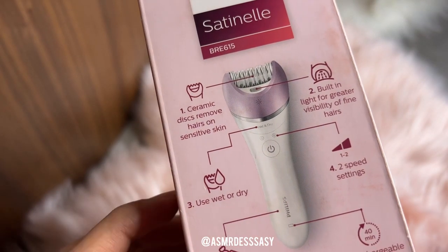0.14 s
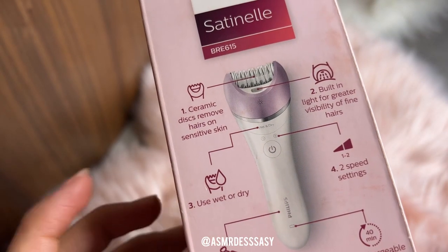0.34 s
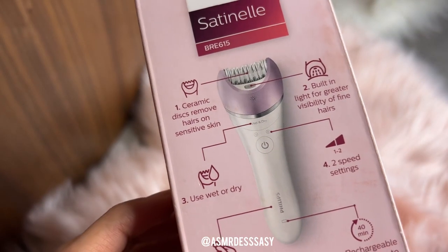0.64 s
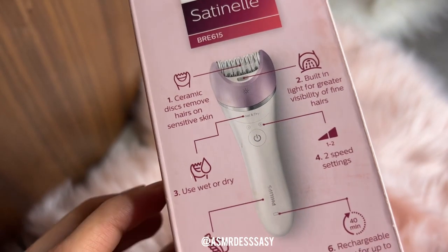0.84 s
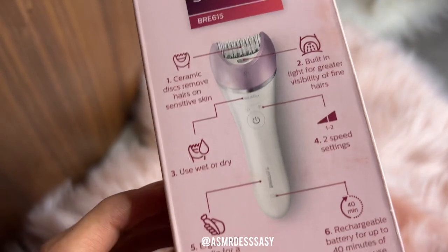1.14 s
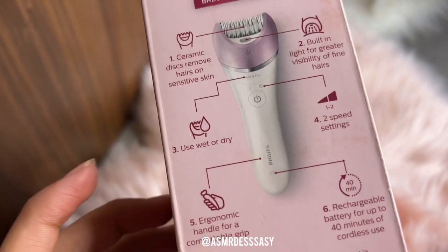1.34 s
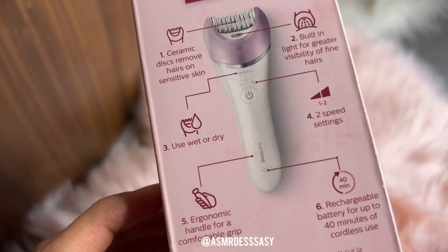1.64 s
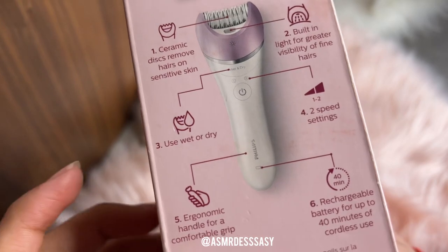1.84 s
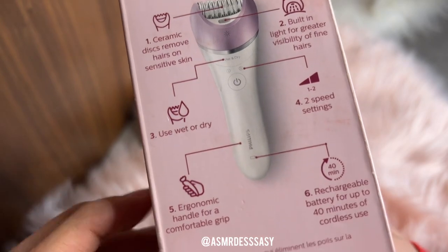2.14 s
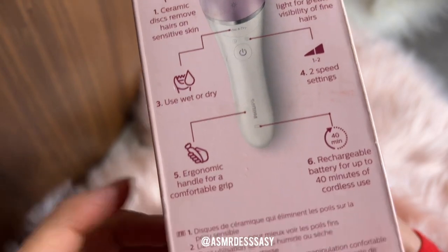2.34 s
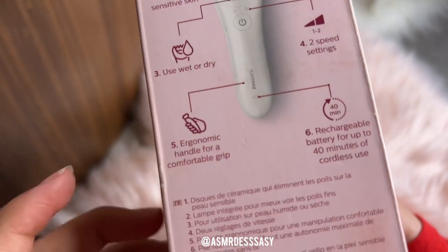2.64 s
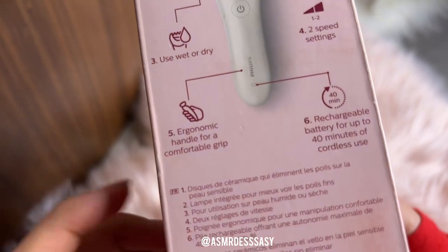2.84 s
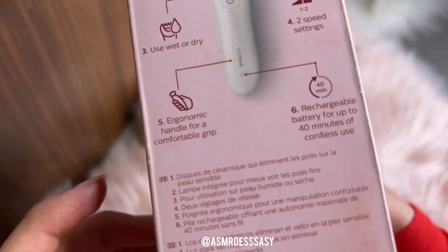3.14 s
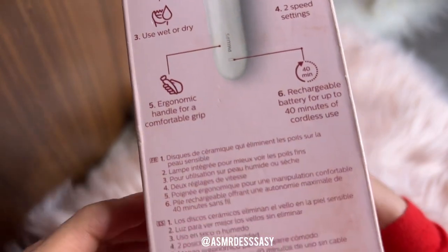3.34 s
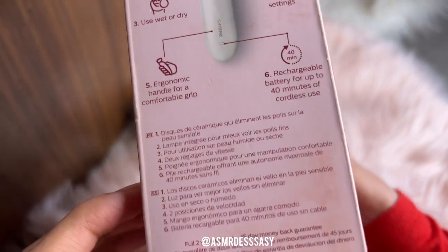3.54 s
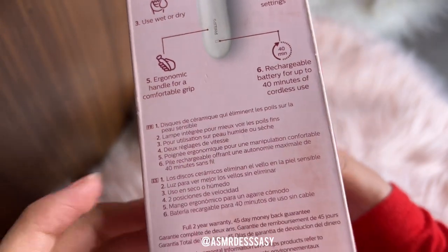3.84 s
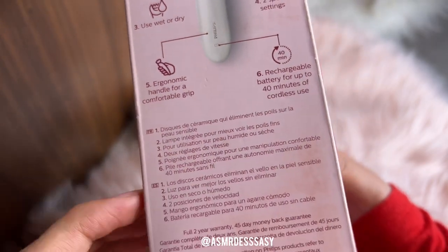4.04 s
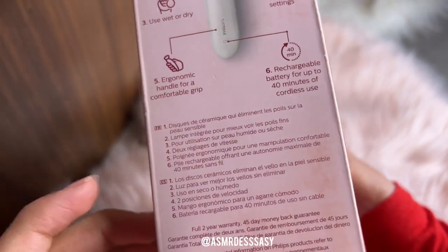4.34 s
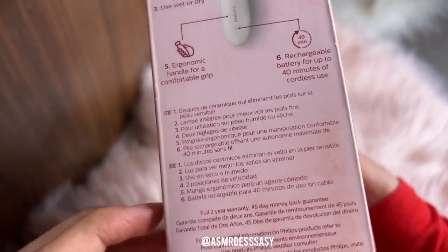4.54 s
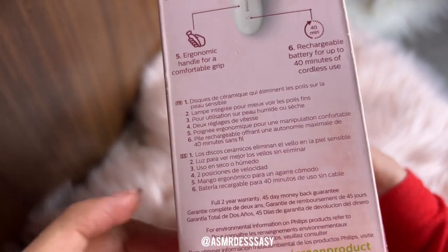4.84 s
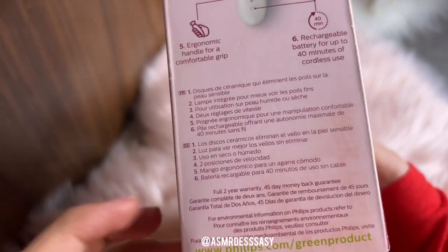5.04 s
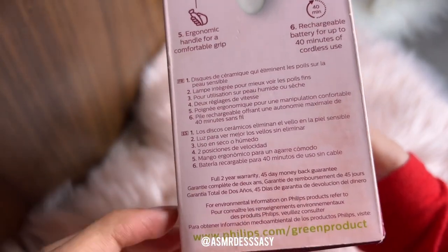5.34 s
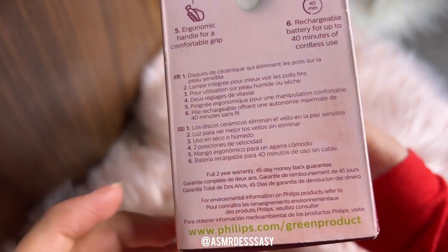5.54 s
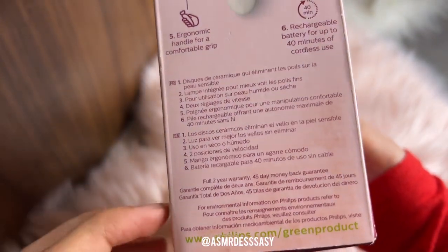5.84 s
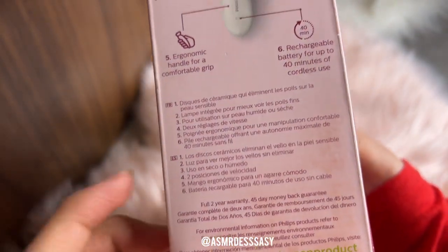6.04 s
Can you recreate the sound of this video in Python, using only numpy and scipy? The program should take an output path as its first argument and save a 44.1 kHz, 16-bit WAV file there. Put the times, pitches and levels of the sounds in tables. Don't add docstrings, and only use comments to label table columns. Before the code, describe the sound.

A close, dry-sounding capture of fingers tapping a light cardboard box in a furnished room. From 0.1 to 2.3 seconds, soft fingertip pads alternate with nails rolling onto pads: warm, hollow thumps with small clicks, strongest near 0.3, 0.55 and 2.1, with a quick double at 1.9. From 2.4 to 3.3, lighter nail taps bring crisp cracks and ringing edges, with a soft pad pair near 2.7. A pause follows until about 4.05, when nails knock the stiff side: firm taps at 4.05 and 4.45, smaller ones to 4.8, then spaced knocks at 4.95, 5.3, 5.75 and 6.1, bright and barely hollow. Each touch dies within a fraction of a second into a faint room tail. Beneath lie soft hiss, a deep unsteady hum and low air movement; very faint, short, falling animal calls appear around 1.6-2, 3-4 and 5.6.

```python
import sys
import numpy as np
from scipy import signal
from scipy.fft import rfft, irfft
from scipy.io import wavfile

SR = 44100
rng = np.random.default_rng(int(sys.argv[2]) if len(sys.argv) > 2 else 0)


def generate_wav(signal):
    frames = np.transpose(np.atleast_2d(signal))
    scaled = np.clip(frames, -1, 1) * 32767
    pcm = np.round(scaled).astype(np.int16)
    wavfile.write(sys.argv[1], SR, pcm)


def to_linear_factor(level_db):
    exponent = np.asarray(level_db, float) / 20
    return 10 ** exponent


N = 272979
T = np.arange(N) / SR
LEAD = 6000


def colour(x, points):
    hz, db = np.transpose(points)
    f = np.fft.rfftfreq(x.shape[-1], 1 / SR) + 1
    gain = to_linear_factor(np.interp(np.log(f), np.log(hz), db))
    y = irfft(rfft(x) * gain, x.shape[-1])
    return y / np.sqrt(np.mean(y ** 2, axis=-1, keepdims=True))


def band(x, hz, octaves):
    limits = np.minimum(hz * 2. ** np.array([-octaves / 2, octaves / 2]), .45 * SR)
    y = signal.sosfilt(signal.butter(2, limits, "bandpass", fs=SR, output="sos"), x)
    return y / np.sqrt(np.mean(y ** 2))


def steep_band_noise(hz, octaves):
    return band(band(rng.standard_normal(N), hz, octaves), hz, octaves)


def fade(t, t60):
    return (t >= 0) * np.exp(-np.log(1000) * np.maximum(t, 0) / t60)


def machine_hum():
    # time in seconds, level in dB.
    hum_level = [(0.0, -35), (0.07, -39.5), (1.34, -38.5), (3.09, -43), (3.19, -74), (3.41, -41),
                 (3.65, -58.5), (3.76, -49), (4.6, -52), (5.0, -74), (5.46, -45.5), (5.88, -64),
                 (5.96, -68), (6.19, -39)]
    line = np.sqrt(2) * to_linear_factor(np.interp(T, *np.transpose(hum_level))) * np.sin(2 * np.pi * 28.9 * T)
    bed = to_linear_factor(-54.5) * band(rng.standard_normal(N), 33.3, 1.18)
    octave_rumble = to_linear_factor(-50.5) * steep_band_noise(58., .55)
    return line + bed + octave_rumble


def hand_sway():
    # time in seconds, level in dB.
    sway_level = [(0, -25.5), (1.3, -33.5), (2.3, -36.5), (2.72, -47.5), (3., -31), (3.8, -34), (4.3, -43),
                  (5.3, -32), (6.19, -35)]
    return to_linear_factor(np.interp(T, *np.transpose(sway_level))) * steep_band_noise(4., 2.2)


def air_and_hiss():
    # frequency in Hz, density in dB per Hz.
    hiss_colour = [(50, -20), (85, -2), (126, -14), (175, -8.5), (233, -15.5), (278, -15.5), (440, -35),
                   (1320, -33.5), (1670, -34), (1830, -35.5), (2480, -36), (7110, -41.5), (16000, -44.5)]
    steady = to_linear_factor(-57.5) * colour(rng.standard_normal(N), hiss_colour)
    ebb_db_per_s = -1.42
    return steady + to_linear_factor(-60 + ebb_db_per_s * T) * band(rng.standard_normal(N), 236.0, 3.34)


def ring(t, modes, contact_s):
    hz, db, t60 = np.transpose(modes)[:, :, None]
    hz = hz * (1 + .03 * rng.standard_normal(hz.shape))
    db = db + 2.5 * rng.standard_normal(db.shape)
    swell = 1 - np.exp(-3 * np.maximum(t, 0) / contact_s)
    decay = np.minimum(fade(t - contact_s, t60) + (t < contact_s), 1)
    swing = np.cos(2 * np.pi * hz * (t - contact_s))
    y = np.sum(to_linear_factor(db) * swell * decay * swing, axis=0)
    return y / np.abs(y).max()


def taps(table, modes, push, contact_s, pad_lag_s, bounce_s, bounce_db, bright_db, tilt_db, soft=0):
    # frequency in Hz, density in dB per Hz.
    crack_colour = [(1120, -8), (1900, -57), (2230, -2), (4590, -7.5), (6050, -12), (6560, -14),
                    (7170, -11.5), (8570, -18), (11300, -19), (15000, -33), (16000, -33)]
    out, t = np.zeros((2, N + 2 * LEAD)), np.arange(LEAD) / SR
    faces = np.array([np.ones(LEAD), fade(t, 0.026)])
    hollow_modes, panel_modes, edge_modes = modes
    pad_contact_s, edge_contact_s = contact_s
    burst = fade(t, 0.002) + to_linear_factor(bounce_db) * fade(t - bounce_s, 0.009) + to_linear_factor(-10.5) * fade(t, 0.045)
    points = [(hz, p + bright_db * np.log2(hz / 4500)) for hz, p in crack_colour]
    click = 1. * (np.arange(LEAD) == 99)
    plain_tick = colour(click, [(1100, -20)] + points[2:])
    for s, db, hollow_db, edge_db, crack_db in table:
        slope = tilt_db - soft * (edge_db + 5.5) * (s > 0)
        tilted = [(hz, p + slope * np.log2(hz / 1000), t60) for hz, p, t60 in edge_modes]
        panel = ring(t - pad_lag_s, panel_modes, pad_contact_s)
        hollow = to_linear_factor(hollow_db) * ring(t - pad_lag_s, hollow_modes, pad_contact_s)
        edge = to_linear_factor(edge_db + 7.5) * ring(t - pad_lag_s / 2, tilted, edge_contact_s)
        body = edge - panel - hollow
        crack = burst * colour(rng.standard_normal(LEAD), points)
        tick = plain_tick * np.sqrt(np.mean(crack ** 2))
        touch = push * body * faces + to_linear_factor(crack_db + 3.0) * np.array([crack, tick])
        start = int(s * SR) + LEAD
        out[:, start:start + LEAD] += to_linear_factor(db + 1.5) * touch
    return out[:, :N + LEAD]


def pads_on_back():
    # start in seconds, panel level in dB,
    # then hollow, edge and crack in dB relative to it.
    past_tap = [
        (-0.034, -18, -1, -17, -44),
    ]
    # start in seconds, panel level in dB, then hollow, edge and crack in dB relative to it.
    pad_taps = [
        (0.301, -16.5, -0.5, -13.5, -27.5),
        (0.465, -26, 5.5, -8.5, -26.5),
        (0.931, -20.5, -1, -12, -26.5),
        (1.215, -33, -2, -11, -23),
        (1.872, -32, -4, -16, -28),
        (1.886, -23, 5, -14, -27.5),
        (2.137, -15.5, -8, -9.5, -24.5),
        (2.315, -25.5, 3.5, -5.5, -15.5),
        (2.662, -27, -2.5, -6.5, -25),
        (2.71, -26, 0, -4, -22),
    ]
    # frequency in Hz, level in dB, t60 in seconds.
    pad_modes = [
        [(86, -37, .05), (124, -4.5, 0.044), (152, -4, 0.042), (192, -26, 0.033)],
        [(280.3, 1, 0.11), (313, -5.5, 0.052), (419, -2, 0.071), (584, -5, 0.051)],
        [(677, 13, 0.073), (843, 18, 0.02), (1126, 10.5, 0.02), (1370, -19, 0.05), (1564, -1, 0.031),
         (1725, -2, 0.034)],
    ]
    return taps(list(past_tap) + list(pad_taps), pad_modes, 0.96, (.0024, .0008), 0, .0018, -1,
                bright_db=-4.5, tilt_db=4, soft=0.75)


def nails_then_pads():
    # start in seconds, panel level in dB, then hollow, edge and crack in dB relative to it.
    rolled_taps = [
        (0.122, -27, -5, -2, -16),
        (0.551, -16.5, -14, -4, -15.5),
        (1.111, -22.5, -4, -4.5, -13.5),
        (1.537, -34.5, -23, -6, -11.5),
        (2.048, -20, -8, -7, -13),
    ]
    # frequency in Hz, level in dB, t60 in seconds.
    rolled_modes = [
        [(133, -6, 0.058), (174, -9, 0.1)],
        [(310, -0.96, 0.048), (324, -1.7, 0.044), (412, -0.52, 0.082)],
        [(638, 13, 0.036), (890, 10.5, 0.024), (1031, 6, 0.0063), (1394, -2, 0.052), (1730, -3, 0.02)],
    ]
    return taps(rolled_taps, rolled_modes, -1.006, (.0022, .0006), 0.0013, .001, -1.9,
                bright_db=-0.6, tilt_db=0.3)


def room(x):
    # centre of an octave band in Hz, level in dB, t60 in seconds.
    tail_bands = [(98, -21.5, 0.14), (171, -25.5, 0.61), (450, -22.5, 0.64), (750, -23.5, 0.38),
                  (1320, -24, 0.56), (2060, -27, 0.27), (3740, -24.5, 0.61), (6060, -20.5, 0.57),
                  (12000, -16.5, 0.42)]
    t = np.arange(SR // 2) / SR
    build = 1 - np.exp(-t / 0.013)
    tail = np.zeros(len(t))
    for hz, db, t60 in tail_bands:
        tail += to_linear_factor(db - 31) * band(rng.standard_normal(len(t)), hz, 1) * fade(t, t60)
    wall = to_linear_factor(-43.5) * band(rng.standard_normal(len(t)), 870.0, 0.93) * fade(t - .0345, 0.0051)
    return signal.fftconvolve(x, build * tail + wall)[:len(x)]


def far_calls():
    # start in seconds, length in seconds, pitch in Hz, level in dB, second partial in dB.
    calls = [
        (1.615, 0.15, 599, -70.5, 2),
        (1.675, 0.14, 628, -58.5, -25),
        (1.938, 0.14, 721, -61.5, -27),
        (1.965, 0.11, 614, -61, -10),
        (2.984, 0.13, 612, -63.5, -4),
        (3.478, 0.059, 594, -61, -17),
        (3.873, 0.167, 617, -60.5, -12),
        (5.541, 0.063, 580, -71, -3),
        (5.61, 0.12, 750, -65, -25),
    ]
    out = np.zeros(N)
    blur = 1 + 0.46 * band(rng.standard_normal(N), 38.0, 1.7)
    waver = band(rng.standard_normal(N), 53.0, 3.3)
    sag_hz_per_s = -65
    for s, length, hz, db, second_db in calls:
        u = np.clip((T - s) / length, 0, 1)
        cycles = length * (hz * u + sag_hz_per_s * length * u ** 2 / 2)
        phase = 2 * np.pi * cycles + .15 * waver
        tone = np.sin(phase) + to_linear_factor(second_db) * np.sin(2 * phase)
        out += to_linear_factor(db) * np.sin(np.pi * u) ** 0.2 * tone
    return out * blur + to_linear_factor(4) * room(out)


def nails_on_back():
    # start in seconds, panel level in dB, then hollow, edge and crack in dB relative to it.
    nail_taps = [
        (2.41, -30.5, -1.5, -2.5, -11.5),
        (2.573, -25, -4.5, -1.5, -24),
        (2.914, -29.5, 0.5, 3, -9),
        (3.181, -28, 1.5, 1.5, -26),
        (3.3, -29.5, -4, 0, -10.5),
        (4.29, -43.5, 4.5, 3, -14),
    ]
    # frequency in Hz, level in dB, t60 in seconds.
    nail_modes = [
        [(81, 0.5, 0.067), (123, 10.5, 0.07), (171, -7, 0.053)],
        [(269, -1, 0.14), (315, -5.5, 0.01), (438, -3, 0.11), (504, -4.5, 0.09)],
        [(698, 7, 0.02), (996, 4, 0.021), (1070, -15, 0.038), (1210, -12, 0.057), (1542, 3, 0.018),
         (1736, -14, 0.049)],
    ]
    return taps(nail_taps, nail_modes, 1, (.0021, .0005), 0, .0018, -2.5, bright_db=-0.5, tilt_db=0.0)


def nails_on_side():
    # start in seconds, panel level in dB, then hollow, edge and crack in dB relative to it.
    side_taps = [(4.057, -20, -27, -10.5, -19), (4.438, -21, -20, -9, -14.5), (4.576, -47, 0, -15, -21),
                 (4.701, -36, -5.5, -8, -24.5), (4.785, -36.5, -2, -7, -16.5),
                 (4.943, -26.5, -26, -9.5, -15.5), (5.33, -26.5, -21, -13, -18.5),
                 (5.596, -49, 2, -10.5, -41), (5.763, -20, -19, -12.5, -16.5), (5.961, -31, -8, -9, -19.5),
                 (6.102, -23.5, -17, -4, -11.5)]
    # frequency in Hz, level in dB, t60 in seconds.
    side_modes = [
        [(129, -6, 0.16), (204, 17, 0.039)],
        [(284, 15.1, 0.022), (337, 9.4, 0.02), (425.3, 3.6, 0.11), (595, 7.1, 0.036)],
        [(653, 2.5, 0.055), (866, 11.5, 0.028), (1147, -10, 0.089), (1420, 2, 0.022), (1597, 3, 0.02),
         (1646, -3.5, 0.041)],
    ]
    return taps(side_taps, side_modes, -1.056, (.0026, .0009), 0, .0022, -2.5, bright_db=3.5, tilt_db=0.7)


def scene():
    background = machine_hum() + hand_sway() + air_and_hiss()
    direct, to_room = pads_on_back() + nails_then_pads() + nails_on_back() + nails_on_side()
    box = (direct + room(to_room))[LEAD:]
    return (box + background + far_calls())[None]


def roll_off(x):
    return signal.sosfilt(signal.butter(12, 16530, fs=SR, output="sos"), x)


def record(dry):
    top_cut = signal.ellip(6, .2, 50, 15900, fs=SR, output="sos")
    return roll_off(signal.sosfilt(top_cut, dry))


dry = scene()
out = record(dry)
generate_wav(out)
```